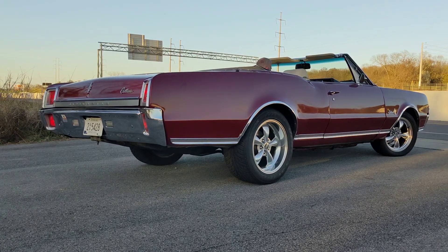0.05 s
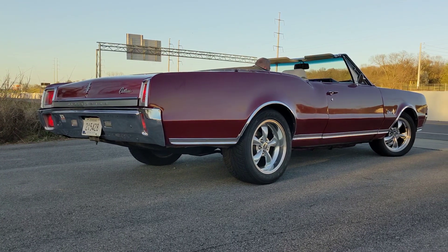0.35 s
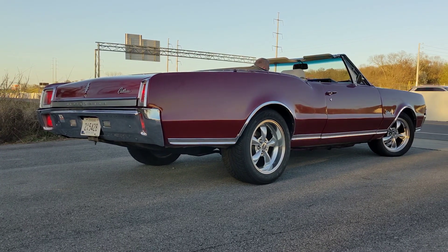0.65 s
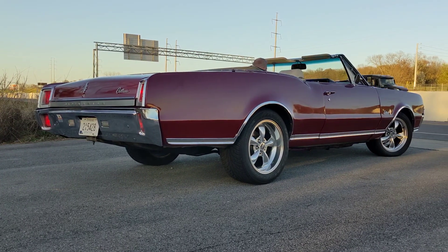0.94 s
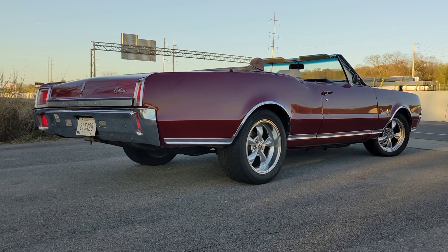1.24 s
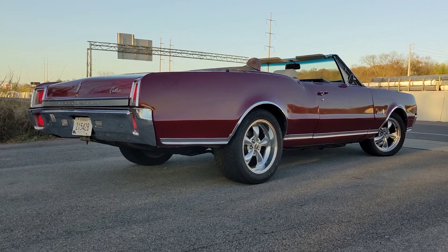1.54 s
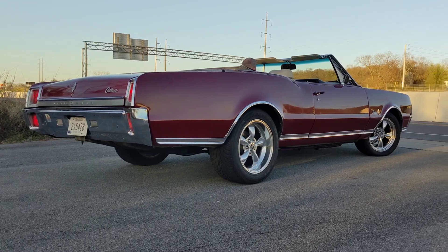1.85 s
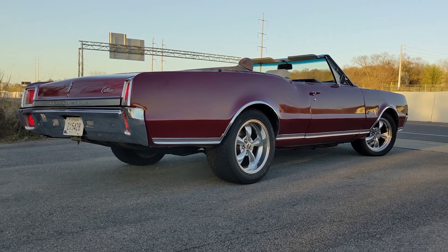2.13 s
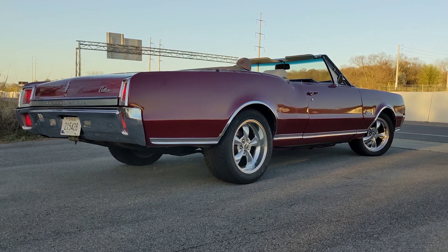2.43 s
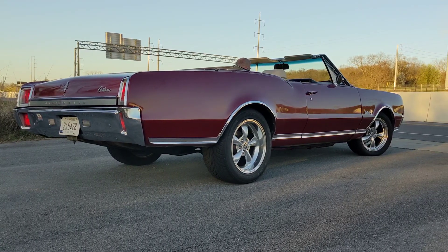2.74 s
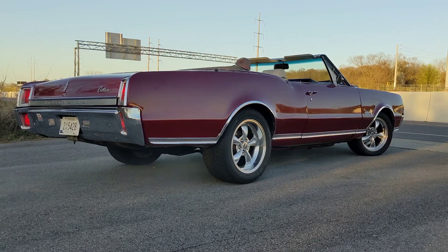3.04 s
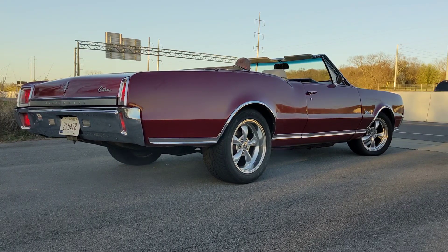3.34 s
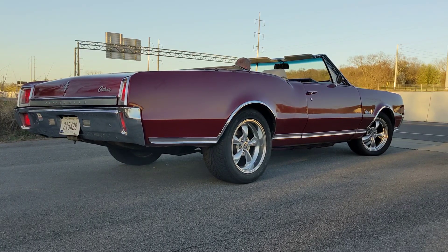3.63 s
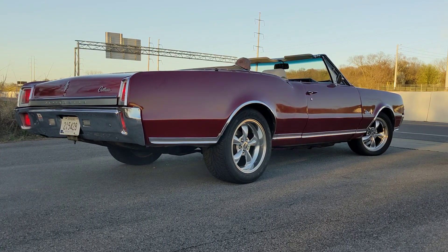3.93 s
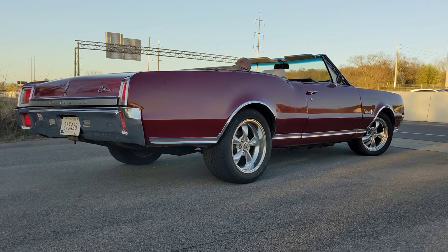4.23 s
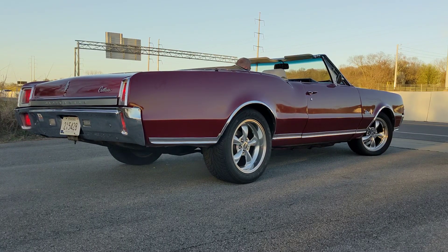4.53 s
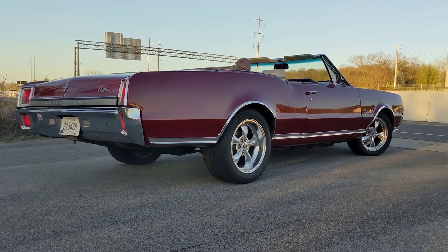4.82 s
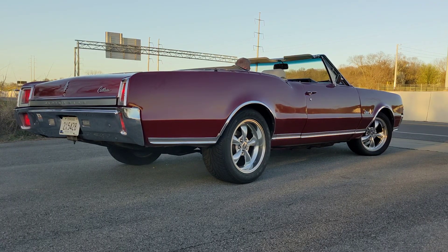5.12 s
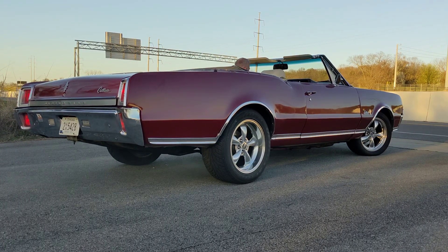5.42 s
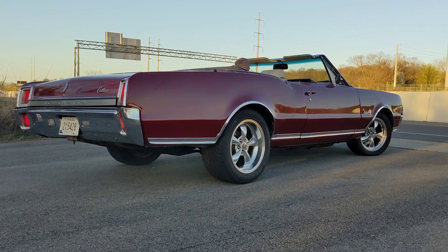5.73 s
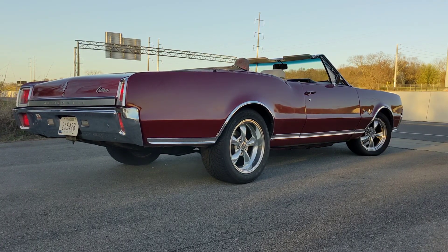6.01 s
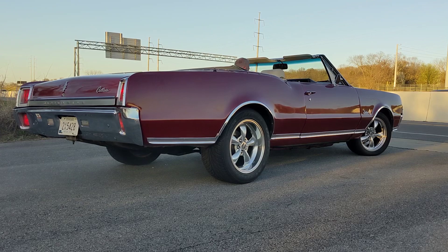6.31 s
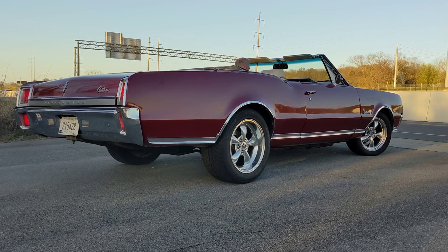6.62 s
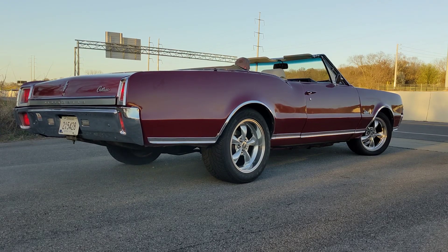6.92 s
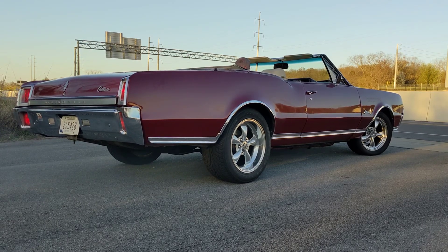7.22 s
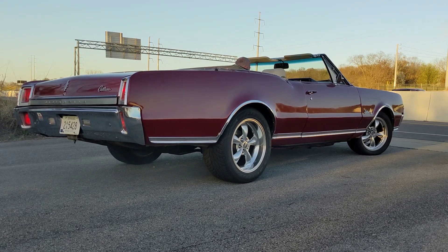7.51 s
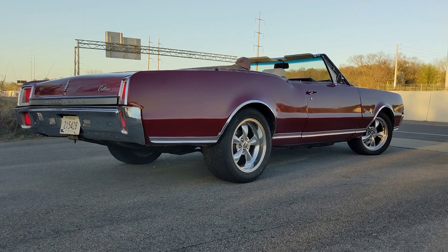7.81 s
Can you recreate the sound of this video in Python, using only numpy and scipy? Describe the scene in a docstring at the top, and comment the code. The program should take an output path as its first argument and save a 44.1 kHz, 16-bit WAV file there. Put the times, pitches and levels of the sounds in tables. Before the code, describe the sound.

A parked convertible's V8 engine is heard from close behind its tail pipes, beside a highway. Already running fast, it is revved twice, the exhaust barking and cracking on the way up and stuttering at the top. It then drones down to a loping idle with a couple of thumps, before a third, longer rev climbs. Fan and intake hiss rise with the engine, and faint traffic lies beyond.

```python
"""V8 revving by a highway

A parked convertible is revved three times, the microphone behind its tail pipes. Close by, firing
pulses ring the pipes: they bark and crack under throttle, stutter at top speed, drone as the engine
runs down and lope near idle. Fan and intake hiss from the far end of the car; traffic lies beyond."""
import sys
import numpy as np
from scipy import signal
from scipy.fft import rfft, irfft
from scipy.io import wavfile
from scipy.ndimage import uniform_filter1d

SR = 44100
rng = np.random.default_rng(int(sys.argv[2]) if len(sys.argv) > 2 else 0)


def wrap_up_sound(samples):
    """Save the sound to the file named by the first command line argument, as 16-bit audio."""
    columns = np.atleast_2d(samples).T
    # keep every value between -1 and 1, then stretch to whole-number steps
    tamed = np.clip(columns, -1, 1)
    steps = np.round(tamed * 32767).astype(np.int16)
    wavfile.write(sys.argv[1], SR, steps)


N = 346626
TIME = np.arange(N) / SR
TAPS = 8192
GRID_HZ = np.maximum(np.arange(TAPS // 2 + 1) * SR / TAPS, 1)

# how alike the noise is on both sides of the microphone: (frequency [Hz], correlation [0-1])
LIKENESS = [(100, .98), (500, .92), (1000, .75), (2000, .42), (4000, .25), (8000, .15), (14000, .1)]
# which way the noise leans: (frequency [Hz], left minus right [dB])
BALANCE_DB = [(200, 4.5), (600, -2), (1100, -3), (2000, 1.5), (4000, -1), (8000, 3.5), (10500, 1.5),
              (13500, -10.5), (16000, -16)]
# tyre noise from the highway: (frequency [Hz], relative level [dB])
TRAFFIC_SPECTRUM = [(20, 9), (60, -1), (200, 0.5), (500, -1), (1000, -10.5), (2000, -19), (4000, -34),
                    (8000, -33), (16000, -55)]
# passing vehicles: (nearest at [s], level [dB], time from there to 3 dB down [s, sign ignored])
PASSES = [(1.0, -29.5, 1), (4.9, -48.5, -2.5)]
# fan and intake at the front of the car: (frequency [Hz], relative level [dB])
HISS_SPECTRUM = [(300, 10), (1500, -6.5), (3000, 2.5), (4000, -1), (5400, 1), (6100, -2), (6700, 3.5),
                 (9000, 0), (10200, -13), (11500, -5), (12400, -9), (14000, 0), (14800, -12), (16000, -8)]
# small ticks from the engine bay: (time [s], relative level [dB])
BAY_TICKS = [(1.085, -26), (1.105, -22), (1.119, -26), (1.165, -21.5), (5.315, -36), (6.305, -48)]
# brief chirps at top speed: (time [s], level [dB], pitch [Hz])
CHIRPS = [(1.828, -20.5, 1430), (1.92, -16, 1400), (3.54, -17, 1277)]
# pedal presses: (start [s], end [s], opening time [s], pull [Hz/s], pull fades this far below top [Hz])
REVS = [(1.098, 2.026, .017, 54.06, 4.73), (2.817, 3.758, .01, 31.61, 3.87),
        (6.249, 7.563, .234, 39.03, 13.6)]
# engine braking, pedal up: (cycle rate [Hz], slowing [Hz/s])
ENGINE_BRAKING = [(11, 7.57), (20, 10.36), (27, 19.2), (38, 23.61), (52, 29.47)]
# cylinders in firing order, the bank nearer the microphone louder: (relative level [dB])
CYLINDER_DB = [1, -6, -5, 0, -6, -1, 1.5, -3]
# standing waves in the pipes: (frequency [Hz], width [Hz], lift [dB])
PIPE_MODES = [(135, 114, 2), (368, 19, 7), (431.6, 32, 7.5), (536, 35, 6.5), (680, 103, 11),
              (859.7, 22, 9.5), (1013, 36, 6.5), (1295, 59, 7.5), (1407, 30, 7.5), (1895, 70, 7),
              (2358, 83, 11), (2880, 210, 4.5), (3200, 75, 8)]
# what mufflers and tail pipes let through: (frequency [Hz], relative gain [dB])
MUFFLER_RESPONSE = [(25, -51), (50, -26), (75, -13.5), (105, -3.5), (145, 0.5), (190, -6), (250, -8),
                    (310, -13), (450, -19.5), (600, -20.5), (750, -16), (900, -17), (1400, -25)]
# turbulent exhaust gas: (frequency [Hz], relative level [dB])
RASP_SPECTRUM = [(100, -14), (300, -5), (500, -4), (800, -5), (1200, -2), (1480, -4), (1650, -9),
                 (2200, -11), (3200, -11), (4200, -20), (8000, -28), (16000, -42)]
# a single puff of exhaust: (frequency [Hz], relative level [dB])
PUFF_SPECTRUM = [(20, -27), (45, -21), (65, -2), (100, 3.5), (150, 4.5), (220, -4), (320, -18),
                 (500, -29.5), (900, -38), (2000, -47), (5000, -55)]
# one cylinder cracks as revs climb: (start [s], end [s], relative level at start [dB], at end [dB])
CRACK_RUNS = [(1.361, 1.56, -25.5, -20), (2.932, 3.22, -20, -29), (7.007, 7.204, -31, -18)]
# hard firings in the run-down: (time [s], peak level [dB])
THUMPS = [(5.485, -9), (5.54, -7.5), (5.599, -20)]
# irregular firings, nearly all weak: (time [s], level change [dB], half length [s])
MISFIRES = [(0.977, -1, .017), (1.07, 2, 0.013), (5.037, -15, 0.024), (5.394, -5.5, 0.22),
            (5.559, -11, 0.014), (5.996, -9, 0.013), (6.065, -10, 0.015), (6.151, -17, .017)]
# the firing breaks up when held flat out: (start [s], end [s], depth [0-1])
STUTTERS = [(1.807, 2.103, 1), (3.515, 3.93, 0.9), (7.45, 7.61, 0.27)]
# relative order levels: (multiple of the cycle rate, coasting [dB], pulling [dB], stuttering [dB])
EXHAUST_ORDERS = [(1, 16, 17, 13), (2, 9, 11, 15), (3, 12, 8, 7), (4, 10, 3, 6), (5, 8, 14, 12),
                  (6, 5, 7, 8), (7, 8, 1, 11), (8, 6, 14, 6), (9, 3, 8, 4), (10, -3, 3, 9), (11, -4, 8, 0),
                  (12, 1, 4, 0), (13, -3, 5, -4), (14, -8, -3, -8), (15, 0, -8, -5), (16, -6, 0, -3),
                  (17, -2, -3, -1), (18, -8, -7, -10), (19, -13, -8, -3), (20, -9, -11, -2),
                  (21, -16, -5, -7), (22, -13, -11, -5), (23, -17, -13, -8), (24, -8, -6, -6)]
# the exhaust, pedal up: (cycle rate [Hz], boom [dB], bark [dB], uneven firing [dB re the boom])
COASTING_LEVELS = [(12, -11.5, -54.5, -11.5), (15.7, -14.5, -24, -11), (21.9, -9.5, -38, -7.5),
                   (26.2, -8, -32, -23), (35.6, -8.5, -26.5, -8), (42, -8, -21, -37), (46.8, -9, -24, -28),
                   (50, -10, -30, -7)]
# under throttle: (cycle rate [Hz], boom [dB], bark [dB], uneven firing [dB re the boom])
PULLING_LEVELS = [(12, -4.5, -45, 1), (20.8, -7.5, -24.5, -17), (29.2, -8, -25.5, 0),
                  (39.4, -11.5, -19.5, -35), (46, -11, -18.5, -10), (55.2, -10, -33.5, -17)]

START_HZ, CRUISE_HZ, TOP_HZ = 36.4, 40, 53.43   # engine speed in four-stroke cycles per second
PEDAL_RELEASE_S, BREATHING_LAG_S = .05, .022   # the gas flow lags behind the pedal
STUTTER_FADE_S, STUTTER_RASP_LIFT_DB = .034, 2.5
STUTTER_BOOM_DB, STUTTER_BARK_DB, STUTTER_UNEVEN_DB = -10, -21, -5.5
# rasp and fan: base level at cruising speed, rise per doubling of speed, change under throttle
RASP_DB, RASP_DB_PER_OCTAVE, RASP_THROTTLE_DB = -30.5, 12.5, -1.4
FAN_DB, FAN_DB_PER_OCTAVE, FAN_THROTTLE_DB = -33, 14, -4
INTAKE_DB, INTAKE_SWELL_S = -42, .14
DIP_FROM_HZ, DIP_SPAN_HZ, DIP_DB = 42.4, 12.5, -7


def from_db(db):
    """Decibels to gain."""
    return np.exp(np.asarray(db) * (np.log(10) / 20))


def rms_one(x):
    """Scale to rms 1."""
    return x / np.sqrt(np.mean(x ** 2) + 1e-20)


def gate(start_s, end_s, attack_s, release_s):
    """Rise to 1, hold, and fall back to 0."""
    return np.clip((TIME - start_s) / attack_s, 0, 1) * np.clip((end_s - TIME) / release_s, 0, 1)


def drift(rate_hz):
    """Smooth random wander with rms 1."""
    knots = rng.standard_normal(2000)
    return rms_one(np.interp(TIME * rate_hz, np.arange(len(knots)), knots))


def strikes(events, decay_s):
    """Sharp attacks that die away, one for each (time [s], level [dB])."""
    clicks = np.zeros(N)
    for s, db in events:
        clicks[int(s * SR)] = from_db(db)
    return signal.lfilter([1], [1, -np.exp(-1 / (decay_s * SR))], clicks + 1e-18)


def by_speed(rows, cycle_hz):
    """Read each column of a table at the engine's speed."""
    hz, *columns = np.transpose(rows)
    return np.array([np.interp(cycle_hz, hz, c) for c in columns])


def on_grid(points):
    """A spectrum joined by straight lines over log frequency."""
    hz, value = np.transpose(points)
    return np.interp(np.log(GRID_HZ), np.log(hz), value)


def causal(db):
    """Log gain and phase of the minimum-phase filter with this spectrum."""
    cepstrum = irfft(np.log(from_db(db)))
    cepstrum[1:TAPS // 2] *= 2
    cepstrum[TAPS // 2 + 1:] = 0
    return rfft(cepstrum)


def colour(x, db):
    """Pass a sound through the causal filter with this spectrum."""
    return signal.oaconvolve(x, irfft(np.exp(causal(db))))[:N]


def stereo_noise(db, envelope, band_hz):
    """Coloured noise at the microphone, wider in the treble; the envelope sets its level in the band."""
    inside = (GRID_HZ > band_hz[0]) & (GRID_HZ < band_hz[1])
    db = db - 10 * np.log10(np.mean(from_db(db) ** 2 * inside))
    alike = np.clip(on_grid(LIKENESS), -.9, .999)
    mid = colour(rng.standard_normal(N) * envelope, db)
    side = colour(rng.standard_normal(N) * envelope, db + 10 * np.log10((1 - alike) / (1 + alike)))
    lean_db = on_grid(BALANCE_DB)
    right_db = 10 * np.log10(2 / (1 + from_db(lean_db) ** 2))
    return np.array([colour(mid + side, right_db + lean_db), colour(mid - side, right_db)])


def traffic(far_db):
    """Tyres on the highway: a steady far wash, and nearer vehicles that swell and fade with distance."""
    passing = sum(from_db(db) ** 2 / (1 + ((TIME - s) / near_s) ** 2) for s, db, near_s in PASSES)
    envelope = np.sqrt(from_db(far_db) ** 2 + passing)
    return stereo_noise(on_grid(TRAFFIC_SPECTRUM), envelope, band_hz=(20, 16000))


def wall_echo(x, delay_s, echo_db):
    """A faint reflection off the roadside wall reaches the microphone from the side, adding width."""
    return x + from_db(echo_db) * np.interp(TIME - delay_s, TIME, x, left=0) * np.array([[1], [-1]])


def fan_and_intake_db(octaves, throttle, dip_db):
    """The fan's level follows the speed; the intake rushes as soon as the throttle cracks open."""
    fan = from_db(FAN_DB + FAN_DB_PER_OCTAVE * octaves + FAN_THROTTLE_DB * throttle + dip_db)
    opening = uniform_filter1d(np.minimum(3 * throttle, 1), int(INTAKE_SWELL_S * SR))
    return 20 * np.log10(np.hypot(fan, from_db(INTAKE_DB) * opening))


def engine_bay(cycles, firing, hiss_db, clatter, flicker_db):
    """A car's length away, fan and intake hiss, with the patter of valve gear and a few ticks."""
    since_firing = cycles * len(CYLINDER_DB) - firing
    valve_taps = rng.exponential(1, firing[-1] + 1)[firing] * np.exp(-since_firing)
    hiss = from_db(hiss_db + flicker_db * drift(35)) * rms_one(1 + clatter * valve_taps)
    ticks = from_db(-9.5) * strikes(BAY_TICKS, decay_s=.0052)
    return stereo_noise(on_grid(HISS_SPECTRUM), hiss + ticks, band_hz=(4000, 9000))


def metal_buzz(cycles, start_s, end_s, hz, width_hz, decay_cycles):
    """A loose piece of metal chatters once in each cycle; it swells, then settles."""
    since_knock = (cycles - np.interp(start_s, TIME, cycles)) % 1
    shake = rms_one(np.exp(-since_knock / decay_cycles))
    swell = gate(start_s, end_s, attack_s=.09, release_s=.31)
    ring_db = -10 * np.log10(1 + (2 * (GRID_HZ - hz) / width_hz) ** 4)
    return swell * stereo_noise(ring_db, shake, band_hz=(2000, 4000))


def chirps(wander, decay_s):
    """Short unsteady tones ring out at the top of a rev."""
    clock = np.cumsum(1 + wander * drift(200)) / SR
    return sum(strikes([(s, db)], decay_s) * np.sin(2 * np.pi * hz * clock) for s, db, hz in CHIRPS)


def through_pipes(spectrum):
    """A spectrum in dB, lifted at the standing waves of the pipes."""
    lift_db = sum(db / (1 + (2 * (GRID_HZ - hz) / width) ** 2) for hz, width, db in PIPE_MODES)
    return on_grid(spectrum) + lift_db


def gas_rasp(cycles, firing, throttle, decay_firings, steady, scatter_db, coast_depth):
    """Each opening exhaust valve lets out a burst of turbulence, sharper under throttle."""
    since_firing = cycles * len(CYLINDER_DB) - firing
    cylinder_db = np.take(CYLINDER_DB, firing % len(CYLINDER_DB))
    strength = from_db(cylinder_db + scatter_db * rng.standard_normal(firing[-1] + 1)[firing])
    bursts = rms_one(strength * np.exp(-since_firing / decay_firings) + steady)
    depth = np.clip(coast_depth + (1 - coast_depth) * throttle, 0, 1)
    envelope = np.sqrt(depth * bursts ** 2 + 1 - depth)
    return stereo_noise(through_pipes(RASP_SPECTRUM), envelope, band_hz=(1100, 2400))


def thumps():
    """Single hard firings boom through the mufflers."""
    boom = colour(strikes(THUMPS, decay_s=.00092), through_pipes(PUFF_SPECTRUM))
    return boom / np.abs(boom).max() * from_db(max(db for _, db in THUMPS))


def cracks(cycles, decay_s, front_s, front_db, scatter_db):
    """Once a cycle a hard blow-down leaves the pipe: a steep pressure front, then a burst of rasp."""
    events = []
    for start_s, end_s, start_db, end_db in CRACK_RUNS:
        crack_cycles = np.arange(*np.interp([start_s, end_s], TIME, cycles))
        times = np.interp(crack_cycles, cycles, TIME)
        levels_db = np.interp(times, [start_s, end_s], [start_db, end_db])
        offsets_db = scatter_db * rng.standard_normal(64)
        events += zip(times, levels_db + offsets_db[:len(times)])
    pipe_db = through_pipes(RASP_SPECTRUM)
    front = from_db(front_db) * colour(strikes(events, front_s), pipe_db)
    return front + stereo_noise(pipe_db, strikes(events, decay_s), band_hz=(500, 4000))


def crank():
    """The pedal spins the engine up, then it brakes itself: (cycle rate [Hz], throttle [0-1])."""
    step = 88   # samples between speed updates
    pedal = np.array([gate(start, end, opening, PEDAL_RELEASE_S) for start, end, opening, _, _ in REVS])
    pull, fade_hz = np.transpose(REVS)[3:]
    drag_hz, drag = np.transpose(ENGINE_BRAKING)
    speeds = [START_HZ]
    for down in pedal[:, ::step].T:
        hz = speeds[-1]
        gained = down @ (pull * np.tanh((TOP_HZ - hz) / fade_hz))
        lost = (1 - down.sum()) * np.interp(hz, drag_hz, drag)
        speeds.append(hz + (gained - lost) * step / SR)
    throttle = np.interp(TIME - BREATHING_LAG_S, TIME, pedal.sum(axis=0))
    return np.interp(np.arange(N) / step, np.arange(len(speeds)), speeds), throttle


def uneven_firing(cycle_hz, firing):
    """No two charges burn alike: puffs of random size fill in between the exhaust orders."""
    sizes = np.clip(rng.standard_normal(firing[-1] + 1), -2, 2)
    puffs = np.diff(firing, prepend=0) * sizes[firing] / np.sqrt(cycle_hz)
    return rms_one(colour(puffs, through_pipes(PUFF_SPECTRUM)))


def misfire_gain():
    """The gain of the boom, sagging at each weak firing."""
    return from_db(sum(db * np.clip(1 - np.abs(TIME - s) / half_s, 0, 1) for s, db, half_s in MISFIRES))


def exhaust_levels(cycle_hz, throttle, stutter):
    """Boom, bark and unevenness in dB follow from speed, throttle and stutter."""
    coasting, pulling = by_speed(COASTING_LEVELS, cycle_hz), by_speed(PULLING_LEVELS, cycle_hz)
    running = (1 - throttle) * coasting + throttle * pulling
    stuttering = np.array([[STUTTER_BOOM_DB], [STUTTER_BARK_DB], [STUTTER_UNEVEN_DB]])
    return (1 - stutter) * running + stutter * stuttering


def exhaust_tone(cycle_hz, cycles, load, stutter, split_hz, waver_db, idle_tilt_db):
    """Firing pulses make multiples of the cycle rate, shaped by the pipes: (low boom, high bark)."""
    step = 8   # the orders are low enough for a reduced sample rate
    cycle_hz, cycles, load, stutter = (c[::step] for c in (cycle_hz, cycles, load, stutter))
    pipes = causal(through_pipes(MUFFLER_RESPONSE))
    slots = np.arange(len(CYLINDER_DB)) / len(CYLINDER_DB)
    idling = np.clip((19 - cycle_hz) / 6, 0, 1)
    restless_db = waver_db * (1 + 2 * idling + 2 * stutter)
    tone, power = 0, 0
    for order, coast_db, pull_db, stutter_db in EXHAUST_ORDERS:
        db = coast_db + load * (pull_db - coast_db)
        db += stutter * (stutter_db - db)
        # slow, soft pulses near idle lose their upper orders
        db += idling * idle_tilt_db * np.log2(max(order, 7))
        pipe = np.interp(order * cycle_hz, GRID_HZ, pipes)
        gain = from_db(db + restless_db * drift(20)[::step]) * np.exp(pipe.real)
        firing_phase = np.angle(from_db(CYLINDER_DB) @ np.exp(-2j * np.pi * order * slots))
        # echoes in the long pipes scramble the timing of the upper orders
        scramble = np.clip((order - 6) / 3, 0, 1) * rng.uniform(-np.pi, np.pi)
        bark_share = np.clip(2 * (order * cycle_hz / split_hz - 1) + .5, 0, 1)
        gains = gain * np.array([1 - bark_share, bark_share])
        tone += gains * np.cos(2 * np.pi * order * cycles + firing_phase + scramble + pipe.imag)
        power += gains ** 2 / 2
    levelled = tone / np.sqrt(power + 1e-6)
    return signal.resample_poly(levelled, step, 1, axis=1, window=("kaiser", 10))[:, :N]


def tail_pipes(cycle_hz, cycles, firing, throttle, stutter):
    """The exhaust note, nearest the microphone: boom with uneven puffs, and the bark above it."""
    # near idle the engine carries its own load again and sounds as under throttle
    load = np.maximum(throttle, np.clip((20 - cycle_hz) / 9, 0, 1))
    boom, bark = exhaust_tone(cycle_hz, cycles, load, stutter,
                              split_hz=333, waver_db=1.72, idle_tilt_db=-13.5)
    boom_gain, bark_gain, uneven = from_db(exhaust_levels(cycle_hz, throttle, stutter * throttle))
    boom = (boom + uneven * uneven_firing(cycle_hz, firing)) / np.sqrt(1 + uneven ** 2)
    bark_fade_in = np.clip((cycle_hz - 14) / 16, 0, 1)
    return misfire_gain() * boom_gain * boom + bark_fade_in * bark_gain * bark


def scene():
    """The roadside from behind the car: the crank drives exhaust and engine bay; traffic passes beyond."""
    cycle_hz, throttle = crank()
    cycles = np.cumsum(cycle_hz * (1 + .0015 * drift(40))) / SR
    firing = (cycles * len(CYLINDER_DB)).astype(int)   # running count of firings
    octaves = np.log2(cycle_hz / CRUISE_HZ)
    stutter = sum(depth * gate(start, end, STUTTER_FADE_S, STUTTER_FADE_S)
                  for start, end, depth in STUTTERS)
    # pedal up at high speed: rasp and hiss dip briefly, then recover as the revs fall
    high_revs = np.clip((cycle_hz - DIP_FROM_HZ) / DIP_SPAN_HZ, 0, 1)
    dip_db = DIP_DB * (1 - throttle) * high_revs
    exhaust = tail_pipes(cycle_hz, cycles, firing, throttle, stutter)
    exhaust = wall_echo(exhaust, delay_s=.084, echo_db=-24)
    rasp_db = RASP_DB + RASP_DB_PER_OCTAVE * octaves + dip_db
    rasp_db += throttle * (RASP_THROTTLE_DB + STUTTER_RASP_LIFT_DB * stutter)
    rasp = from_db(rasp_db) * gas_rasp(cycles, firing, throttle, decay_firings=.89, steady=.68,
                                       scatter_db=3.5, coast_depth=.5)
    hiss_db = fan_and_intake_db(octaves, throttle, dip_db)
    bay = engine_bay(cycles, firing, hiss_db, clatter=.19, flicker_db=1.35)
    buzz = metal_buzz(cycles, start_s=1.391, end_s=2, hz=2830, width_hz=130, decay_cycles=.31)
    cracking = cracks(cycles, decay_s=.0043, front_s=.0006, front_db=14.5, scatter_db=1)
    accents = thumps() + cracking + chirps(wander=.04, decay_s=.024)
    return traffic(far_db=-48.5) + bay + from_db(-32.5) * buzz + accents + rasp + exhaust


def record(dry):
    """After the microphone, the highest peaks are rounded off and the treble is cut above 15.8 kHz."""
    rounded = dry / (1 + np.abs(dry) ** 8) ** (1 / 8)
    return signal.sosfilt(signal.ellip(12, .1, 90, 15800, fs=SR, output="sos"), rounded)


dry = scene()
out = record(dry)
wrap_up_sound(out)
```